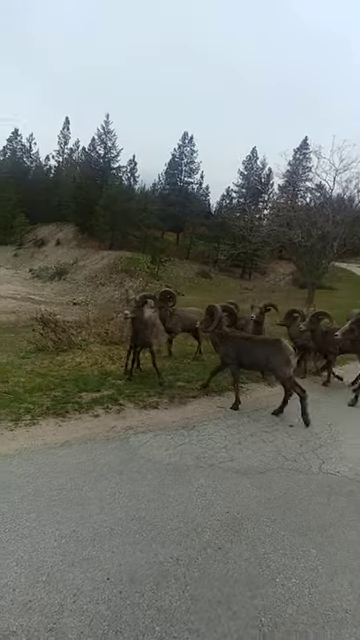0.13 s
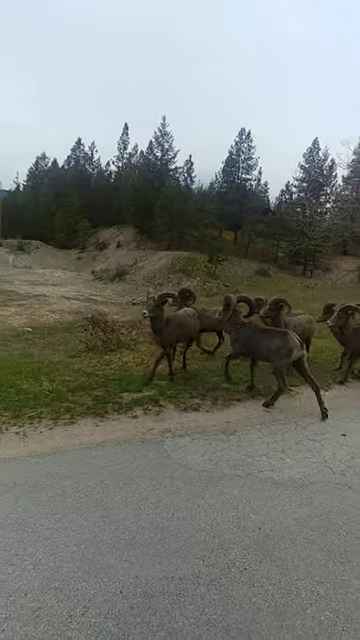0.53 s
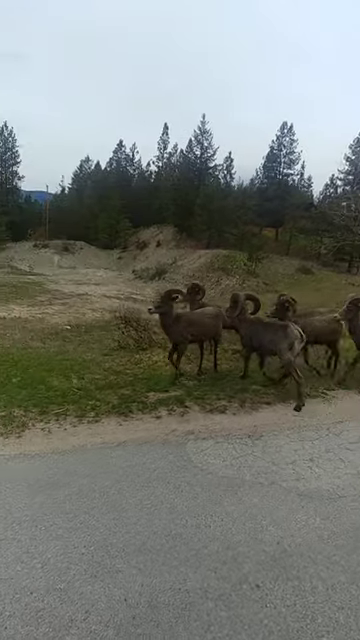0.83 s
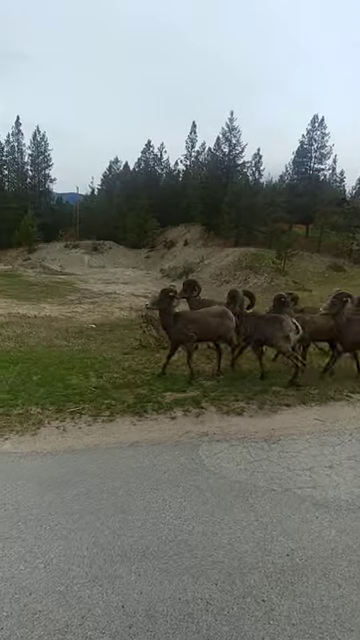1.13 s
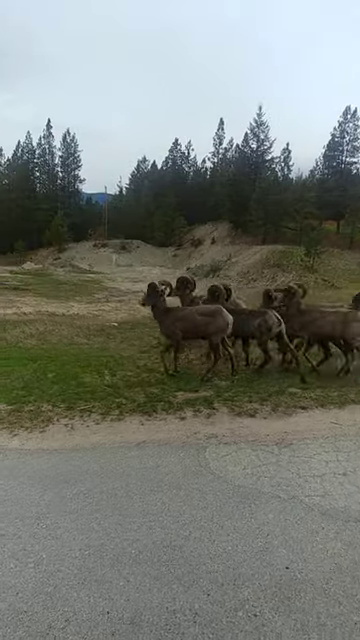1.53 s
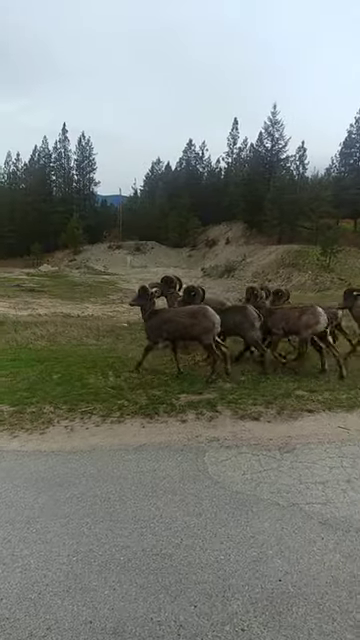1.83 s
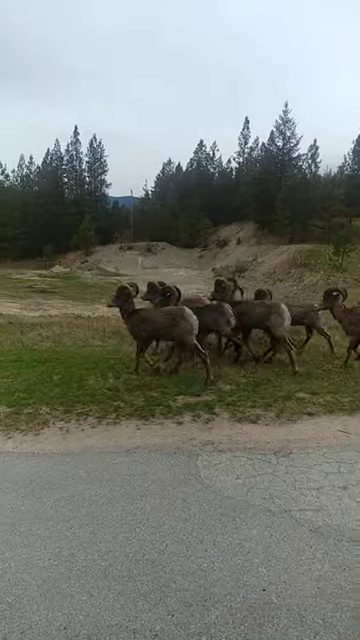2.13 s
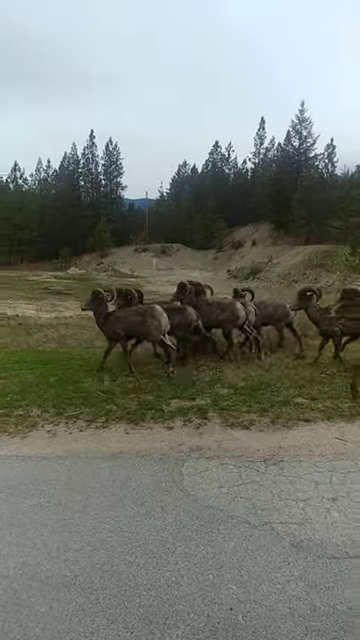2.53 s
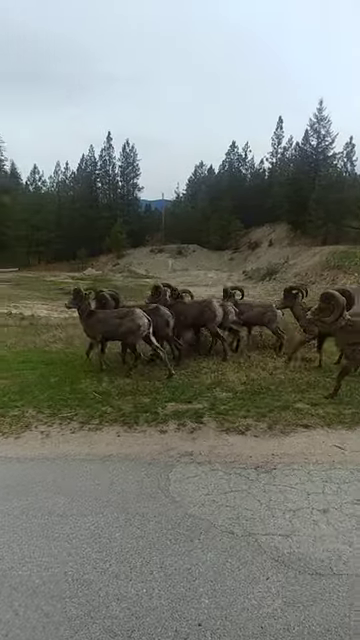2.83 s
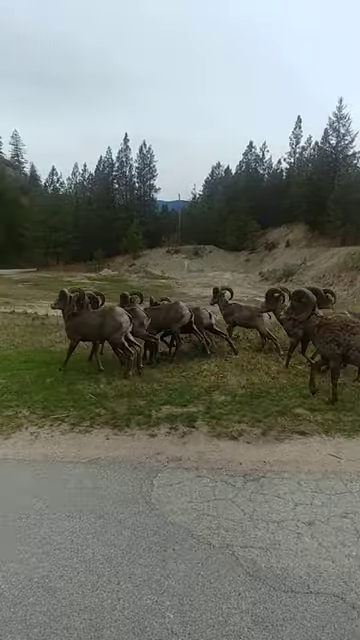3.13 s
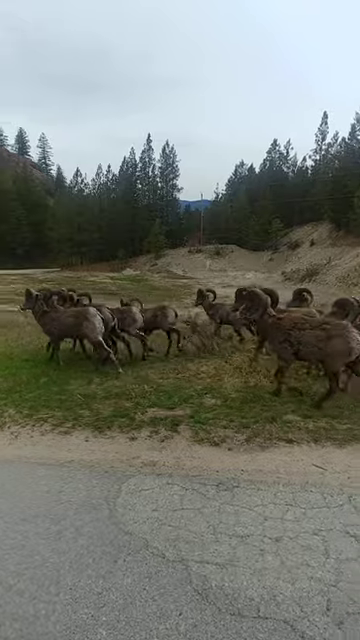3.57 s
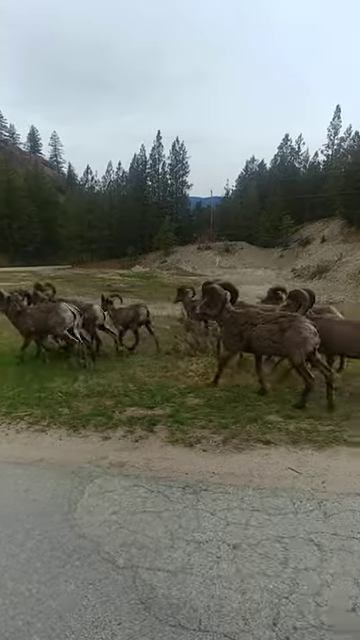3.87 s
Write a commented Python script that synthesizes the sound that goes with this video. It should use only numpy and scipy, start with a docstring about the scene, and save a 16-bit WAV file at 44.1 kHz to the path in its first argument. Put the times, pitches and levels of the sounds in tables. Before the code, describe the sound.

Wind rumbles and thumps against an outdoor stereo microphone, light at first and strong after two seconds, over faint hoof knocks, dry grass swishes and small stem snaps from a trotting herd of wild sheep.

```python
"""Herd in dry grass, windy microphones

A herd of wild sheep moves through dry grass while gusts buffet two microphone ports.
Wind is lumpy low noise with buffets and sharp flicks of pressure; the hush is a steady coloured wash.
Leg swishes are ticks in hiss and stem snaps very short bursts, both coloured as the microphones
hear grass; hoof knocks are short rings with a scrape of grit."""
import sys
import numpy as np
from scipy import signal
from scipy.fft import rfft, irfft
from scipy.io import wavfile
from scipy.ndimage import uniform_filter1d

SR = 44100
rng = np.random.default_rng(int(sys.argv[2]) if len(sys.argv) > 2 else 0)


def transcribe(u):
    """Save the signal u as a 16-bit wav file named by the first command-line argument.

    u: samples, shape (n,) or (channels, n), limited to [-1, 1]; the rate is SR.
    q: integer samples, one column per channel.
    """
    v = np.clip(np.atleast_2d(u).T, -1, 1)
    q = np.round(v * 32767).astype(np.int16)
    wavfile.write(sys.argv[1], SR, q)


N = 176400

CORNER_LEFT_HZ, CORNER_RIGHT_HZ = 31.6, 58  # turbulence corners at the reference level
HERD_PAN_DB = 5  # left over right


def amp(db):
    """Turns dB into gain."""
    return 10 ** (np.asarray(db) / 20)


def unit(x):
    """Scales to rms 1."""
    return x / np.sqrt(np.mean(x ** 2) + 1e-20)


def read(points, hz):
    """Reads a spectrum on a log frequency axis."""
    f, value = np.transpose(points)
    return np.interp(np.log(hz + 1), np.log(f + 1), value)


def smooth_chance(count, span):
    """Slow random wobble of rms 1, smooth over about span points."""
    z = rng.standard_normal(count)
    lowpass = np.exp(-(np.fft.rfftfreq(count) * 2 * span) ** 2)
    return unit(irfft(rfft(z) * lowpass, count))


def hush():
    """Steady outdoor wash: coloured noise, alike at both ports in the bass and unlike in the treble."""
    # Colour of the wash: (frequency [Hz], relative density [dB per Hz])
    wash_colour = [(64, -0.5), (157, -7.5), (265, -21.5), (373, -23), (598, -19.5), (664, -22),
                   (720, -13.5), (790, -21.5), (1300, -30.5), (7620, -44.5), (10800, -57.5), (15900, -46.5)]
    # Left-right likeness: (frequency [Hz], likeness [0 to 1])
    likeness = [(400, 0.72), (1400, 0)]
    level_db, pan_db = -39, 2  # overall level; left over right
    frames, hz = N // 512 + 5, np.fft.rfftfreq(2048, 1 / SR)
    a, b, c, d = rng.standard_normal((frames, 1025, 4)).T
    left, other = a + 1j * b, c + 1j * d
    same = np.clip(read(likeness, hz), -1, 1)[:, None]
    right = same * left + np.sqrt(1 - same ** 2) * other
    spectra = np.array([left, right]) * amp(read(wash_colour, hz)[:, None])
    wash = unit(signal.istft(spectra, nperseg=2048, noverlap=1536)[1][:, :N])
    return amp(level_db + pan_db * np.array([[.5], [-.5]])) * wash


def flick(stretch):
    """One sharp swing of pressure: a cosine in a bell-shaped envelope, slower when stretched."""
    flick_hz, flick_s = 238.4, 0.00093  # swing rate and half-width to 1/e, before stretching
    t = np.arange(-400, 400) / SR / stretch
    return -np.exp(-(t / flick_s) ** 2) * np.cos(2 * np.pi * flick_hz * t)


def flicks():
    """The strongest swings of wind pressure, on the right port only."""
    # Strong flicks: (time [s], peak [dB])
    strong = [(2.073, -9.5), (2.283, -7.5), (3.326, -5), (3.663, -2.5)]
    right = np.zeros(N)
    for s, db in strong:
        right[round(s * SR) - 400:][:800] += amp(db) * flick(1)
    return np.array([0 * right, right])


def gust_power(level, buffets):
    """Wind power over time: a base level with random lumps, plus bell-shaped single buffets."""
    lump_db, lump_s = 3.6, .018  # rms depth and smoothness
    buffet_s = 0.016  # half-length of a buffet, to 1/e of its power
    t = np.arange(N) / SR
    base_db = np.interp(t, *np.transpose(level))
    power = amp(base_db + lump_db * smooth_chance(N, lump_s * SR)) ** 2
    return power + sum(amp(db) ** 2 * np.exp(-((t - s) / buffet_s) ** 2) for s, db in buffets)


def turbulence(power, corner_hz):
    """Low noise whose corner climbs with the gust and jumps with each eddy, held near a steady level."""
    corner_rise, reference_db = 0.37, -19.5  # dB of corner per dB of wind above the reference
    eddy_db, eddy_frames = 1.3, 1.1  # rms depth and smoothness of the corner's jumps
    slope_db, bend = 13.5, 0.84  # drop at the corner; how the slope flattens towards the treble
    low_cut_hz, low_cut_steep = 80, 1.6
    steady, steady_s = .9, .022  # how far the noise is evened out, and over what time
    frames, hz = N // 256 + 5, np.fft.rfftfreq(1024, 1 / SR)[:, None]
    frame_power = np.interp(np.arange(frames) * 256 / SR, np.arange(N) / SR, power)
    lift_db = corner_rise * (10 * np.log10(frame_power) - reference_db)
    corner = corner_hz * amp(lift_db + eddy_db * smooth_chance(frames, eddy_frames))
    low_cut = (1 + (low_cut_hz / (hz + 1)) ** 2) ** low_cut_steep
    shape = amp(-slope_db * (hz / corner) ** bend) / low_cut
    shape = shape / np.linalg.norm(shape, axis=0)  # equal power in every frame
    a, b = rng.standard_normal((frames, 513, 2)).T
    noise = signal.istft((a + 1j * b) * shape, nperseg=1024, noverlap=768)[1][:N]
    span = round(steady_s * SR)
    local_power = uniform_filter1d(uniform_filter1d(noise ** 2, span), span)
    return unit(noise / local_power ** (steady / 2))


def gust(level, buffets, corner_hz):
    """Wind at one port: turbulence and a flutter of small random flicks, both riding on the gust."""
    flutter_per_s, flutter_db = 40, -1.5  # average rate; strength against the turbulence
    power = gust_power(level, buffets)
    noise = turbulence(power, corner_hz)
    train = rng.standard_normal(N) * (rng.random(N) < flutter_per_s / SR)
    # A port with a lower corner gets slower flicks
    flutter = signal.oaconvolve(train, flick(CORNER_RIGHT_HZ / corner_hz), "same")
    return (noise + amp(flutter_db) * flutter) * np.sqrt(power)


def to_ports(x, other, pan_db, lag=18):
    """Places a herd sound: x lag samples later at the left port, x mixed with other at the right."""
    same = .42  # share of x at the right port; other may be x itself
    left = np.roll(x, lag) * amp(pan_db / 2)
    right = (same * x + np.sqrt(1 - same ** 2) * other) * amp(-pan_db / 2)
    return np.array([left, right])


def knocks():
    """Hooves on hard ground: decaying sine modes ring briefly over a longer scrape of band-passed grit."""
    # Hoof knocks: (time [s], level before panning [dB], pitch scale [ratio])
    hits = [(.561, -42, 1.8), (.587, -39.5, 1.4), (.813, -29.5, 1.03), (1.852, -31.5, .95),
            (2.678, -36.5, 1)]
    # Hoof modes: (frequency before pitch scaling [Hz], relative level [dB], time to fall 60 dB [s])
    modes = [(520, -3, .06), (820, 0, .08), (1180, -6, .05)]
    scrape_db, scrape_t60, scrape_hz = -12, .17, 700  # rms at the start against the ring's peak; s; Hz
    rise_s = .001
    out, t = np.zeros((2, N)), np.arange(6000) / SR
    phases = rng.random((len(hits), len(modes)))  # random, one for each mode of each hit
    grit = rng.standard_normal((len(hits), 2, 6000))
    band = signal.butter(2, [scrape_hz / 2, scrape_hz * 2], "band", fs=SR)
    grit = unit(signal.lfilter(*band, grit))
    for (s, db, scale), turns, dust in zip(hits, phases, grit):
        ring = np.zeros(6000)
        for (hz, mode_db, t60), turn in zip(modes, turns):
            ring += amp(mode_db - 60 * t / t60) * np.sin(2 * np.pi * (hz * scale * t + turn))
        scrape = dust * amp(scrape_db - 60 * t / scrape_t60)
        hit = ring / abs(ring).max() + scrape
        out[:, round(s * SR):][:, :6000] += amp(db) * hit * np.minimum(t / rise_s, 1)
    return to_ports(out[0], out[1], HERD_PAN_DB, lag=0)


def grass_bands(x):
    """Colours x as grass sounds through the microphones and splits it into low, middle and top bands."""
    # Grass as the microphones hear it, with a bright peak near 7.6 kHz and a dip near 10.7 kHz:
    # (frequency [Hz], relative density [dB per Hz])
    heard_grass = [(1200, -17.5), (2000, -19), (3120, -8.5), (6800, -2), (7650, 0.5), (8500, -1),
                   (10700, -28), (12400, -12), (15900, -6.5)]
    low_split_hz, top_split_hz = 2180, 8220
    hz = np.fft.rfftfreq(N, 1 / SR)
    low = 1 / (1 + (hz / low_split_hz) ** 4)
    top = 1 / (1 + (top_split_hz / (hz + 1)) ** 20)
    parts = np.array([low, 1 - low - top, top])
    return irfft(rfft(x) * amp(read(heard_grass, hz)) * parts, N)


def snaps():
    """Stems snapping: very short, fast-decaying noise bursts, coloured as the microphones hear grass."""
    # Snaps: (time [s], peak before panning [dB], gain of the top band [dB])
    breaks = [(1.692, -30, -2), (1.864, -35, -4), (1.934, -36, -6), (1.979, -28.5, -8), (3.016, -31, 0),
              (3.205, -38, -8), (3.406, -24, 19)]
    t60 = .009  # s
    out, t = np.zeros((2, N)), np.arange(600) / SR
    bursts = rng.standard_normal((len(breaks), 600)) * amp(-60 * t / t60)
    for (s, db, top_db), burst in zip(breaks, bursts):
        x = np.zeros(N)
        x[round(s * SR):][:600] = burst
        low, middle, top = grass_bands(x)
        x = low + middle + amp(top_db) * top
        snap = amp(db) * x / abs(x).max()
        out += to_ports(snap, snap, HERD_PAN_DB)  # alike at both ports
    return out


def swish_power():
    """Power of the low, middle and top bands as each leg swells and fades with straight slopes in dB."""
    # Legs through grass: (peak time [s], middle-band level before panning [dB], rise [s], fall [s],
    # top band against the middle [dB])
    legs = [(.224, -53, 0.0032, 0.013, -23), (.494, -52.5, 0.026, 0.027, -4),
            (.594, -56, 0.062, 0.018, -13), (.673, -56.5, 0.048, 0.02, -18),
            (0.966, -59, 0.0057, 0.0066, 3.5), (1.227, -61, 0.047, 0.03, 6.5),
            (1.442, -58.5, 0.018, 0.031, -2), (1.548, -58.5, 0.012, 0.11, 6.5),
            (1.693, -44.5, 0.014, 0.034, 0.5), (1.865, -47.5, 0.023, 0.062, 6),
            (1.977, -45, 0.038, 0.038, 4.5), (2.239, -47.5, 0.036, 0.042, 9),
            (2.33, -56.5, 0.025, 0.021, 6.5), (2.469, -49, 0.04, 0.066, 4), (2.596, -39, 0.017, 0.025, 3),
            (2.69, -53, 0.13, 0.068, 1), (2.838, -56, 0.029, 0.04, 7.5), (2.934, -53.5, 0.011, 0.052, 5),
            (3.018, -48, 0.021, 0.0084, 8.5), (3.105, -46.5, 0.076, 0.035, 6),
            (3.2, -54.5, 0.079, 0.028, 0), (3.624, -53, 0.19, 0.16, 4), (0.122, -50, 0.0068, 0.0093, -33)]
    flank_db = -8  # drop one rise before and one fall after the peak
    low_share, low_offset_db = 0.51, -10  # the low band follows this share of the level, plus the offset
    t, power = np.arange(N) / SR, np.zeros((3, N))
    for s, db, rise, fall, top_db in legs:
        low_db = low_offset_db - (1 - low_share) * db
        shape_db = db + flank_db * np.where(t < s, (s - t) / rise, (t - s) / fall)
        power += amp(shape_db + np.array([[low_db], [0], [top_db]])) ** 2
    return power


def stalks():
    """Three bands of random stalk ticks, separate in each band, within a shared fine hiss."""
    per_s, spread_db = 1200, 4  # ticks in each band; average boost of a tick, up to four times that
    share = .45  # of the power in ticks
    hits = rng.random((3, N)) < per_s / SR
    boost = amp(spread_db * np.minimum(rng.exponential(1, (3, N)), 4))
    ticks = rng.standard_normal((3, N)) * boost * hits
    hiss = rng.standard_normal(N)
    bands = grass_bands(np.sqrt(share) * unit(ticks) + np.sqrt(1 - share) * hiss)
    return bands / bands[1].std()


def swishes():
    """Legs brushing stalks: dense ticks in hiss, swelling with each leg, the colour patchy between tufts."""
    patch_db, patch_frames, patch_bins = 2.5, 8, 5  # rms depth; size in time and in frequency
    envelope = np.sqrt(swish_power())
    layers = [(stalks() * envelope).sum(0) for _ in range(2)]  # two, so the ports can differ
    spectra = signal.stft(layers)[2]
    patches = rng.standard_normal(spectra[0].T.shape)
    patches = uniform_filter1d(uniform_filter1d(patches, patch_frames, 0), patch_bins, 1)
    patchy = signal.istft(spectra * amp(patch_db * unit(patches).T))[1][:, :N]
    return to_ports(*patchy, HERD_PAN_DB)


def scene():
    """Wind at each port over the herd and the hush."""
    # Base wind at each port: (time [s], level [dB])
    wind_left = [(0, -22), (.3, -31.5), (.8, -38), (1.05, -37.5), (1.6, -27.5), (1.8, -39), (2.0, -19),
                 (3.0, -20.5), (3.3, -20.5), (4.0, -14.5)]
    wind_right = [(0, -47), (1.75, -51), (1.84, -26.5), (2.03, -26), (2.1, -15), (2.58, -19), (2.8, -26.5),
                  (3.1, -21.5), (3.35, -16), (4.0, -16.5)]
    # Single buffets at each port: (time [s], level added at the peak [dB])
    buffets_left = [(.075, -23), (1.1, -19), (1.139, -20.5), (1.272, -17.5), (2.23, -16.5), (2.34, -11.5),
                    (2.43, -16), (2.805, -23), (3.15, -9.5), (3.254, -9), (3.354, -14), (3.432, -10),
                    (3.623, -12), (3.773, -5), (3.828, -9.5), (3.909, -11), (3.983, -6)]
    buffets_right = [(0.639, -29.5), (0.694, -29), (1.473, -25), (1.525, -25), (2.199, -16.5),
                     (2.294, -11.5), (2.341, -13.5), (2.887, -16), (3.258, -11), (3.328, -10.5),
                     (3.424, -9), (3.482, -10.5), (3.578, -8.5), (3.678, -11), (3.815, -9.5), (3.873, -9)]
    left = gust(wind_left, buffets_left, CORNER_LEFT_HZ)
    right = gust(wind_right, buffets_right, CORNER_RIGHT_HZ)
    wind = np.array([left, right])
    return wind + flicks() + hush() + swishes() + snaps() + knocks()


def record(dry):
    """Steep rumble cut, soft overload near full scale, then the band limit."""
    rumble_cut_hz, knee, edge_hz = 57, .8, 15950  # the knee is where overload starts, in full scales
    x = signal.sosfilt(signal.butter(6, rumble_cut_hz, "high", fs=SR, output="sos"), dry)
    over = np.maximum(abs(x) - knee, 0)
    x = x - np.sign(x) * (over - (1 - knee) * np.tanh(over / (1 - knee)))
    band_limit = signal.firwin(511, edge_hz, window=("kaiser", 9), fs=SR)
    return signal.oaconvolve(x, band_limit[None], "same", axes=1)


dry = scene()
out = record(dry)
transcribe(out)
```